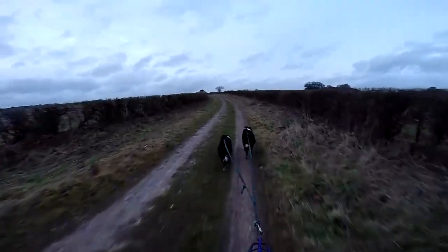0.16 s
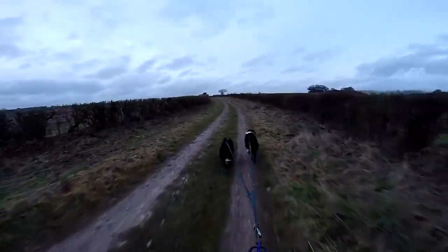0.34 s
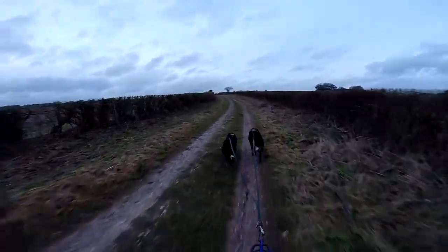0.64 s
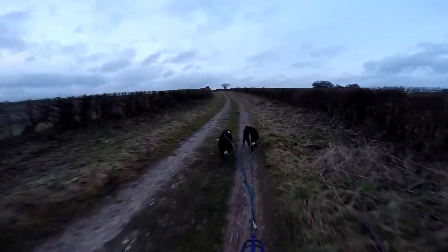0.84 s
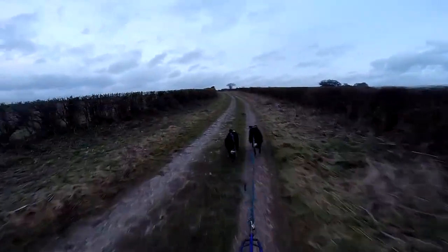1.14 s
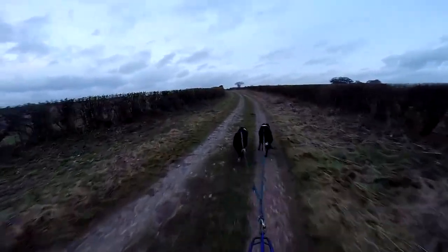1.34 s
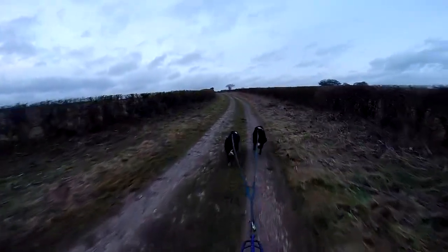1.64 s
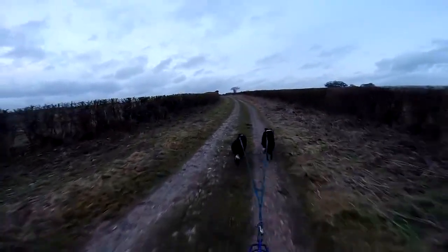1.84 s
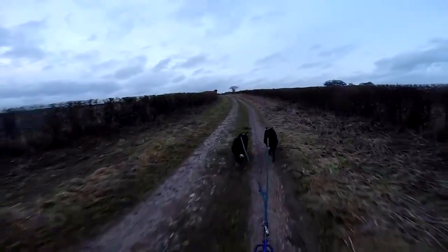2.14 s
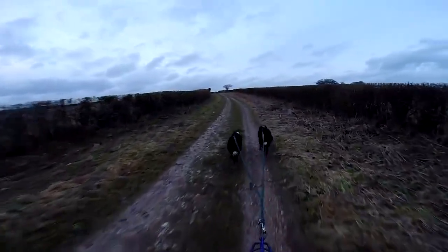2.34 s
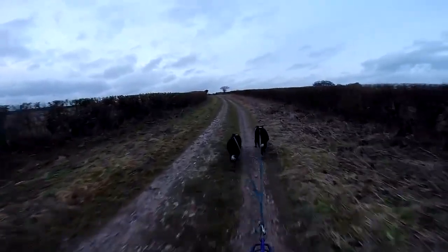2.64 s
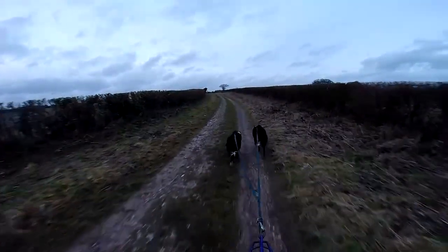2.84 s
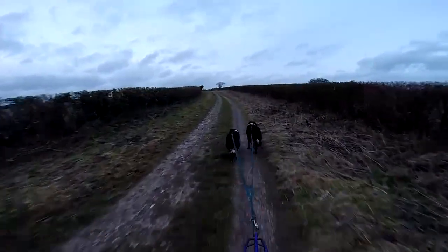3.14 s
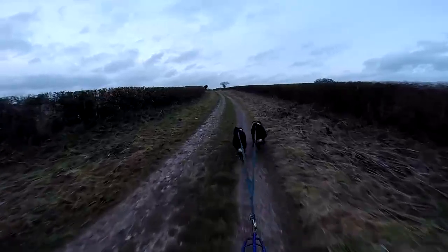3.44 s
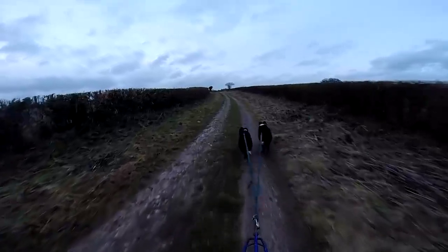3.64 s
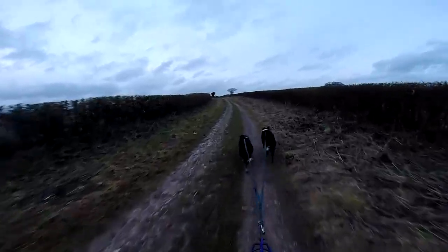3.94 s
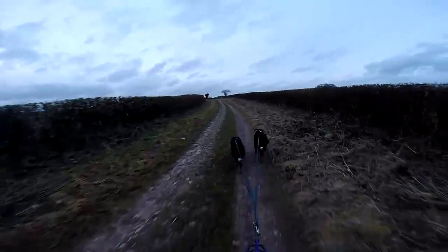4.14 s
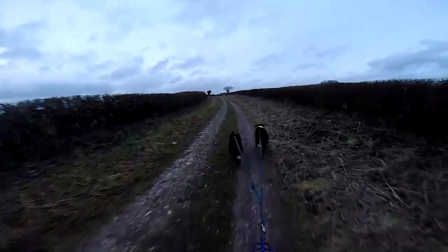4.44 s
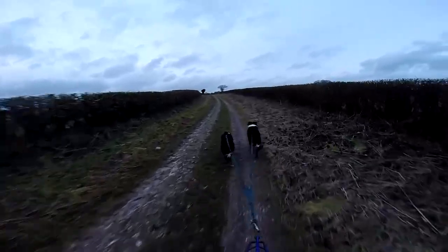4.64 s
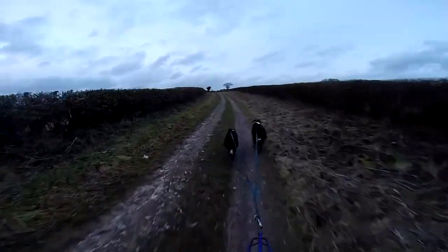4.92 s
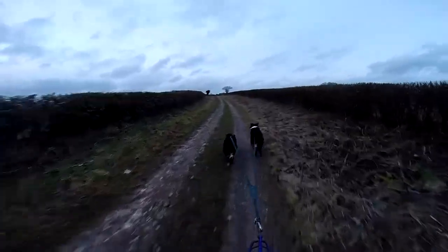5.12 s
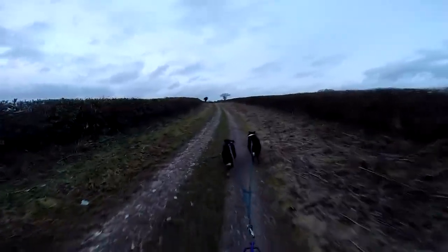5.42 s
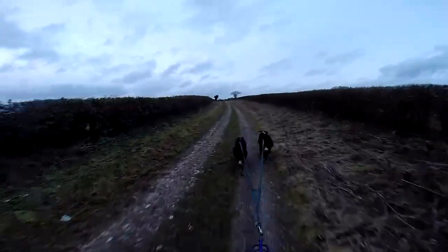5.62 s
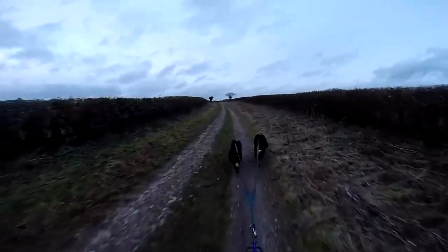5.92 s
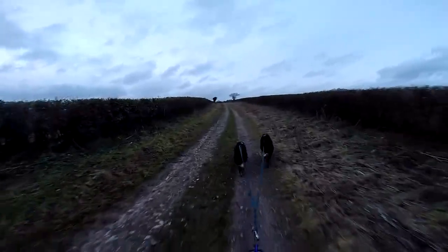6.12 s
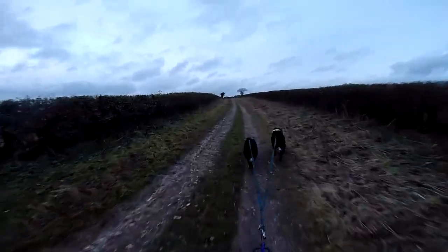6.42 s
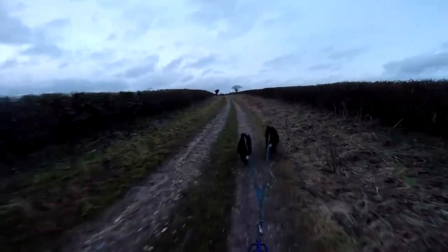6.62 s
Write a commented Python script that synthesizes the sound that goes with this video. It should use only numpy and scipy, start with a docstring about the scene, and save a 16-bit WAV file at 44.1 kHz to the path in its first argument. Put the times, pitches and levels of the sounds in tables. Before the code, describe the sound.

Outdoors on a rough track, scooter tyres scuff briefly through loose dirt and a puff of wind bumps the enclosed microphone. Patches of crackling gravel and irregular pebble pops follow, with a boxy ring, over a low, uneven rumble. A metal hook clinks faintly now and then. Toward the end two stones hit the scooter with dry cracks, the second loudest, followed by more short skids, ticks and knocks.

```python
"""A scooter pulled by two dogs rolls along a gravelly dirt track, heard from inside a closed camera case
that rings boxily at 1.5-3.5 kHz. Wind and the shaking mount rumble underneath from the start.
In the first second the tyres skid, drag through dirt and flick pebbles; then they crunch over patches
of gravel while the tow-line's hook clinks and the frame ticks and thuds now and then. Near 5.4 s two
stones crack against the frame, and the ride goes on through more scuffs, pebbles and gravel."""
import sys
import numpy as np
from scipy import signal
from scipy.fft import rfft, irfft, next_fast_len
from scipy.io import wavfile
from scipy.ndimage import uniform_filter1d

SR = 44100
rng = np.random.default_rng(int(sys.argv[2]) if len(sys.argv) > 2 else 0)


def persist_wave(psi):
    """Save psi, clipped to +-1, as 16-bit WAV."""
    counts = np.round(np.clip(psi, -1, 1) * 32767).astype(np.int16)
    wavfile.write(sys.argv[1], SR, np.atleast_2d(counts).T)


N = 298557


def from_db(db):
    return 10 ** (np.asarray(db) / 20)


def unit_rms(x):
    return x / np.sqrt(np.mean(x ** 2) + 1e-20)


def unit_peak(x):
    return x / np.max(np.abs(x))


def fader(rows):
    """A level in dB at every sample, gliding from point to point."""
    times, levels_db = np.transpose(rows)
    return np.interp(np.arange(N) / SR, times, levels_db)


def add(track, start_s, sound):
    """Mix a sound into the track at its start time."""
    at = max(0, round(start_s * SR))
    track[at:at + len(sound)] += sound[:max(0, N - at)]


def drift(rate_hz):
    """A smooth random wobble with a spread of about 1, mostly slower than rate_hz."""
    step, run_in = 20, 2000
    pole = np.exp(-2 * np.pi * rate_hz * step / SR)
    white = rng.standard_normal(N // step + run_in + 2)
    slow = signal.lfilter([1], [1, -2 * pole, pole * pole], white)[run_in:]
    return np.interp(np.arange(N) / step, np.arange(len(slow)), unit_rms(slow))


def swells(rows, rise_s, decay_s):
    """Envelope of overlapping swells: each rises smoothly to its peak, then dies away."""
    t, power = np.arange(N) / SR, 0
    for peak_s, db in rows:
        shape = np.exp(-(np.minimum(t - peak_s, 0) / rise_s) ** 2 - np.maximum(t - peak_s, 0) / decay_s)
        power = power + (from_db(db) * shape) ** 2
    return np.sqrt(power)


def patches(rows, edge_s):
    """Envelope of stretches of ground that the tyres take edge_s to roll onto, and off."""
    t, power = np.arange(N) / SR, 0
    for start_s, length_s, db in rows:
        on_patch = np.clip(np.minimum(t - start_s, start_s + length_s - t) / edge_s + .5, 0, 1)
        power = power + (from_db(db) * on_patch) ** 2
    return np.sqrt(power)


def equalise(x, curve):
    """Shape the tone with a minimum-phase EQ, so nothing rings ahead of an attack."""
    size = 2 * next_fast_len(len(x) // 2 + 2048)
    hz, db = np.transpose(curve)
    bins_hz = np.maximum(np.arange(size // 2 + 1) * SR / size, 1)
    gain = from_db(np.interp(np.log(bins_hz), np.log(hz), db))
    cepstrum = irfft(np.log(gain))
    cepstrum[1:size // 2] *= 2
    cepstrum[size // 2 + 1:] = 0
    return irfft(rfft(x, size) * np.exp(rfft(cepstrum)))[:len(x)]


def resonance(x, hz, width_hz):
    """A two-pole resonance with gain 1 at its peak."""
    radius = np.exp(-np.pi * width_hz / SR)
    feedforward = np.array([1, 0, -1]) * (1 - radius ** 2) / 2
    feedback = [1, -2 * radius * np.cos(2 * np.pi * hz / SR), radius ** 2]
    return signal.lfilter(feedforward, feedback, x + 1e-18)


def ring(x, modes):
    """A body's resonances, sounding in parallel."""
    return sum(from_db(db) * resonance(x, hz, width_hz) for hz, width_hz, db in modes)


def noise(curve, flutter_db, flutter_hz):
    """Equalised noise whose level flutters; rms 1."""
    return unit_rms(equalise(rng.standard_normal(N) * from_db(flutter_db * drift(flutter_hz)), curve))


def grains(per_s, spread_db):
    """Random clicks, many small and a few larger."""
    sizes = from_db(spread_db * np.minimum(rng.exponential(1, N), 3))
    signs = rng.choice([-1, 1], N)
    return sizes * signs * (rng.random(N) < per_s / SR)


def contact(scatter, decay_s):
    """One sharp blow followed by a dying spray of tiny contacts."""
    t = np.arange(2600) / SR
    blow = scatter * rng.standard_normal(len(t)) * np.exp(-t / decay_s)
    blow[0] = 1
    return blow


# The boxy ring of the case. Each row: pitch in Hz, width in Hz, level in dB over the direct sound.
CASE_RESONANCES = [(1100, 130, -10.5), (1625, 110, -4.5), (1860, 43, -0.5), (2070, 14, 2), (2455, 225, -4),
                   (3253, 160, 3), (4400, 130, -4.5), (5460, 106, -1.5), (8380, 93, -2.5)]
def case(x):
    """Sound passes through the camera case and sets it ringing."""
    return x + ring(x, CASE_RESONANCES)


# The tone of the hiss. Each row: frequency in Hz, gain in dB.
HISS_EQ = [(200, -1), (600, 10), (1000, 8), (4000, 3), (7000, -2), (10000, -6), (13000, -11),
           (15000, -18.5)]
def hiss():
    """A faint, nearly steady bed of hiss, coloured by the case."""
    return from_db(-64) * unit_rms(case(noise(HISS_EQ, flutter_db=0.63, flutter_hz=3.4)))


# The sub-bass of the shaking mount. Each row: frequency in Hz, gain in dB.
MOUNT_EQ = [(10, -20), (20, -10.5), (26, -1), (33, -16.5), (55, -23.5), (100, -48.5), (1000, -140)]
# Bumps in the track. Each row: time of the peak in seconds, level in dB.
TRACK_BUMPS = [(.49, -42), (.9, -39.5), (1.14, -32.5), (1.38, -39), (1.61, -39.5), (2.21, -39), (2.64, -35),
               (2.97, -50), (3.11, -46), (3.31, -45), (3.58, -40), (4.05, -43.5), (4.25, -39.5),
               (4.58, -44), (4.98, -39.5), (5.21, -46), (5.43, -35.5), (5.7, -40.5), (5.93, -36),
               (6.15, -43.5), (6.36, -35.5)]
def mount_rumble():
    """The camera mount shakes near its own slow resonance, and harder at every bump."""
    steady = from_db(-50 + 2 * drift(0.69))
    shake = np.hypot(steady, swells(TRACK_BUMPS, rise_s=0.063, decay_s=0.13))
    rumble = noise(MOUNT_EQ, flutter_db=0, flutter_hz=15)
    rumble /= np.sqrt(uniform_filter1d(rumble ** 2, size=3000))   # evened out: the shake sets the level
    return shake * rumble


# The low tone of wind on the case. Each row: frequency in Hz, gain in dB.
WIND_EQ = [(25, -5.5), (50, 4.5), (90, 0), (130, -3.5), (190, -10.5), (300, -26), (600, -33), (4000, -110)]
# The rise and fall of the breeze. Each row: time in seconds, level in dB.
BREEZE_FADER = [(0, -47.5), (.25, -46.5), (.36, -43.5), (.7, -47.5), (1.4, -52.5), (2.45, -55.5),
                (3.3, -56), (4.1, -51.5), (4.8, -53.5), (6.1, -48.5), (6.45, -53.5), (6.77, -51)]
# Quick gusts. Each row: time of the peak in seconds, level in dB.
WIND_GUSTS = [(1.12, -41.5), (1.74, -46.5), (2.67, -51), (3.57, -43.5), (4.19, -47), (4.63, -43.5),
              (5.28, -50), (6.7, -51)]
# Puffs of air. Each row: start in seconds, level in dB, pitch in Hz.
AIR_PUFFS = [(0.784, -23.5, 95), (5.968, -35, 69.6)]
def wind():
    """Eddies buffet the case, and two puffs hit it squarely."""
    strength = np.hypot(from_db(fader(BREEZE_FADER)), swells(WIND_GUSTS, rise_s=0.028, decay_s=0.026))
    air = strength * noise(WIND_EQ, flutter_db=3, flutter_hz=13.7)
    t = np.arange(3000) / SR
    for start_s, db, hz in AIR_PUFFS:
        # a push and a smaller pull, gone after about one cycle
        add(air, start_s, from_db(db) * np.sin(2 * np.pi * hz * t) * np.exp(-1.6 * hz * t))
    return air


# The dull tone of the juddering frame. Each row: frequency in Hz, gain in dB.
JUDDER_EQ = [(70, -14), (160, -5), (330, 3.5), (420, -6.5), (550, -16), (1000, -20), (4000, -67)]
# Thuds over ruts. Each row: start in seconds, peak level in dB.
RUT_THUDS = [(2.203, -55), (3.824, -50), (4.33, -51.5), (4.886, -45), (5.395, -43.5), (5.529, -48),
             (5.968, -43.5), (6.288, -47)]
def frame_thuds():
    """The frame judders briefly and dully over a rut."""
    out = np.zeros(N)
    for start_s, db in RUT_THUDS:
        thud = equalise(contact(scatter=1, decay_s=0.0081), JUDDER_EQ)
        add(out, start_s, from_db(db) * unit_peak(thud))
    return out


# The bright tone of a tick on the frame. Each row: frequency in Hz, gain in dB.
TICK_EQ = [(200, -12), (800, 3), (3500, 11), (4800, 0.5), (5800, 7.5), (6600, -6), (7700, 4.5), (9000, -25),
           (15000, -45)]
# The midrange tone of a knock or a pebble's pop. Each row: frequency in Hz, gain in dB.
KNOCK_EQ = [(300, -17), (900, 1.5), (1500, 2.5), (2500, 1.5), (3400, -3), (3800, -2), (5800, -12.5),
            (7000, -15.5), (15000, -41)]
# The body of the frame. Each row: pitch in Hz, width in Hz, level in dB.
FRAME_RESONANCES = [(358, 64, 1), (740, 220, -7), (1080, 450, -1)]
# Hard ticks. Each row: start in seconds, peak level in dB, knock level in dB over the tick.
FRAME_TICKS = [(1.188, -43, -22), (3.832, -54, 15.5), (5.533, -57.5, 17), (5.9648, -39.5, -24),
               (6.036, -36, -6), (6.1997, -29.5, -28), (6.3665, -46.5, 5), (6.642, -47, 8.5)]
def frame_ticks():
    """Each hard blow gives a bright tick and makes the frame knock dully."""
    out = np.zeros(N)
    for start_s, db, knock_db in FRAME_TICKS:
        blow = contact(scatter=1, decay_s=0.001)
        tick = unit_peak(case(equalise(blow, TICK_EQ)))
        knock = unit_peak(ring(equalise(blow, KNOCK_EQ), FRAME_RESONANCES))
        add(out, start_s, from_db(db) * (tick + from_db(knock_db) * knock))
    return out


# The ring of the metal hook. Each row: pitch in Hz, width in Hz, level in dB.
HOOK_RESONANCES = [(9300, 160, -1), (9860, 240, -2), (11000, 1100, -9)]
# Clinks of the hook. Each row: start in seconds, peak level in dB.
HOOK_CLINKS = [(1.188, -58), (2.661, -56), (2.740, -58), (5.026, -59), (6.3645, -55), (6.4434, -56)]
def hook_clinks():
    """The tow-line's snap hook is jolted and rings, thin and high."""
    out = np.zeros(N)
    for start_s, db in HOOK_CLINKS:
        clink = ring(contact(scatter=0.5, decay_s=0.0027), HOOK_RESONANCES)
        add(out, start_s, from_db(db) * unit_peak(clink))
    return out


# The low-mid tone of rolling tyres. Each row: frequency in Hz, gain in dB.
ROAR_EQ = [(100, -8), (200, -1.5), (320, -2.5), (430, -6.5), (900, -13), (1500, -23.5), (8000, -69)]
# The rise and fall of the roar. Each row: time in seconds, level in dB.
ROAR_FADER = [(0, -55), (.25, -62), (.58, -58), (.93, -56.5), (1.05, -61.5), (2.2, -60.5), (3.1, -63),
              (4.0, -62), (4.8, -61), (5.9, -61), (6.22, -57), (6.45, -60.5), (6.77, -61)]
def tyre_roar():
    """The tyres roll over the track with a soft, fluttering roar."""
    return from_db(fader(ROAR_FADER)) * noise(ROAR_EQ, flutter_db=1.5, flutter_hz=60)


# The rasp of rubbed dirt. Each row: frequency in Hz, gain in dB.
SCUFF_EQ = [(100, -9), (340, 2.5), (600, -33.5), (900, -13), (1150, -2.5), (1800, -0.5), (2400, -1.5),
            (3200, -8), (4500, -14), (6000, -12.5), (7000, -33), (10000, -34.5), (15000, -51)]
def scuff(per_s):
    """Dirt rubbed sideways: dense fine grains in clumps; rms 1."""
    rub = grains(per_s * from_db(4.6 * drift(50)), spread_db=3)
    return unit_rms(case(equalise(rub, SCUFF_EQ)))


# The rise and fall of the rubbing. Each row: time in seconds, level in dB.
DIRT_FADER = [(0, -55.5), (.36, -58.5), (.55, -50), (.68, -52), (.87, -58), (1.04, -62.5), (1.28, -58),
              (2.45, -63), (2.9, -59), (3.75, -61.5), (4.5, -59.5), (4.94, -63), (5.8, -61), (6.15, -56),
              (6.77, -60)]
def dirt_rub():
    """The tread rubs over fine dirt all along the track."""
    return from_db(fader(DIRT_FADER)) * scuff(per_s=7000)


# Short skids over loose dirt. Each row: start in seconds, length in seconds, level in dB.
TYRE_SKIDS = [(0.325, 0.078, -44.5), (0.558, 0.044, -47.5), (1.277, .16, -62), (5.069, 0.097, -54.5),
              (5.59, 0.048, -50.5), (5.683, 0.076, -54.5)]
def skids():
    """A tyre slides: dirt rattles, sand sprays against the frame, and a hard skid adds a low judder."""
    attack_s, release_s = 0.016, 0.024
    slide = np.zeros(N)
    for start_s, length_s, db in TYRE_SKIDS:
        t = np.arange(round(length_s * SR)) / SR
        envelope = np.clip(np.minimum(t / attack_s, (length_s - t) / release_s), 0, 1)
        add(slide, start_s, from_db(db) * envelope)
    rasp = from_db(2 * drift(160)) * scuff(per_s=1600)
    judder = from_db(-0.5) * np.sqrt(unit_peak(slide)) * noise(JUDDER_EQ, flutter_db=2, flutter_hz=49)
    spray = grains(per_s=2800, spread_db=10.5)
    sand = from_db(-12) * unit_rms(case(equalise(spray, TICK_EQ)))
    return slide * (rasp + judder + sand)


# Drags through soft dirt. Each row: start in seconds, length in seconds, level in dB.
TYRE_DRAGS = [(.34, 0.047, -51.5), (.54, 0.066, -63), (.63, 0.11, -52), (.77, 0.071, -55),
              (.83, 0.057, -51), (5.86, 0.031, -54.5), (5.975, 0.099, -58), (6.25, 0.18, -65)]
def drags():
    """A tyre ploughs through dirt: clumps of grains rasp in one broad resonance as the frame judders."""
    rasp_hz, width_hz = 1800, 840
    rub = grains(per_s=2600 * from_db(5 * drift(90)), spread_db=5.5)
    rasp = resonance(resonance(rub, rasp_hz, width_hz), rasp_hz, width_hz)
    judder = from_db(-5.5) * noise(JUDDER_EQ, flutter_db=1.5, flutter_hz=24)
    return patches(TYRE_DRAGS, edge_s=0.017) * (unit_rms(rasp) + judder)


# The bite of cracking grit. Each row: frequency in Hz, gain in dB.
CRUNCH_EQ = [(500, -5.5), (1200, -7), (1900, -7.5), (2600, 4.5), (3300, 1), (3650, -2), (4400, -6.5),
             (4900, -14.5), (5900, -8.5), (6700, -15), (9000, -15), (15000, -51)]
# Patches of gravel. Each row: start in seconds, length in seconds, level in dB.
GRAVEL_PATCHES = [(1.237, 0.18, -50), (1.516, 0.02, -52), (1.701, .2, -62), (2.11, .2, -61),
                  (2.515, 0.13, -57), (2.697, .62, -59), (3.41, 0.15, -55.5), (3.828, 0.083, -53),
                  (4.045, 0.563, -57), (5.857, .27, -60.5), (6.323, 0.12, -55), (6.489, .35, -58.5)]
def gravel_crunch():
    """Grit cracks under the tread in clumps over fine dust; each grain rings at one of five pitches."""
    thin_cover = from_db(-63.5)
    level = np.hypot(thin_cover, patches(GRAVEL_PATCHES, edge_s=0.047))
    level_db = 20 * np.log10(level)
    thickness_db = level_db - np.mean(level_db)
    # more grains crack in a thicker patch, so it merges into one dense crunch
    per_s = 52 * from_db(1.1 * thickness_db + 5 * drift(45))
    pitches_hz = np.geomspace(2000, 4200, num=5)
    grit = sum(resonance(grains(per_s, spread_db=2.5), hz, width_hz=1080) for hz in pitches_hz)
    grit = unit_rms(grit * from_db(-0.55 * thickness_db))   # offsets the loudness of the extra grains
    dust = from_db(-7) * rng.standard_normal(N)
    return level * unit_rms(case(equalise(grit + dust, CRUNCH_EQ)))


# The dry tone of stone on frame. Each row: frequency in Hz, gain in dB.
CRACK_EQ = [(300, -41), (900, -10.5), (1500, 0), (2400, 4.5), (3300, -5.5), (3750, -25), (5500, -31),
            (7000, -34), (15000, -55)]
# A stone's chatter as it leaves the frame. Each row: delay in seconds, level in dB against the blow.
STONE_REBOUNDS = [(.0013, -26), (.0037, -10), (.0076, -24)]
# Stone hits. Each row: start in seconds, peak level in dB.
STONE_HITS = [(5.3826, -28), (5.4299, -17)]
def stone_cracks():
    """A stone hits the frame: one broad, dry crack and a few softer, duller rebounds."""
    rebound_cutoff_hz, ring_db = 1710, -1.5
    out, blow, chatter = np.zeros(N), np.zeros(SR // 20), np.zeros(SR // 20)
    blow[0] = 1
    for delay_s, db in STONE_REBOUNDS:
        chatter[round(delay_s * SR)] = from_db(db)
    chatter = signal.lfilter(*signal.butter(2, rebound_cutoff_hz, fs=SR), chatter)
    crack = equalise(blow + chatter, CRACK_EQ)
    crack = unit_peak(crack + from_db(ring_db) * ring(crack, CASE_RESONANCES))
    for start_s, db in STONE_HITS:
        add(out, start_s, from_db(db) * crack)
    return out


# Pebbles flicked by the tyres. Each row: start in seconds, peak level in dB, pitch in Hz.
PEBBLE_POPS = [(0.2893, -40, 1550), (0.3201, -29, 2500), (0.3223, -30, 2730), (0.3428, -31, 1500),
               (0.366, -33, 2000), (0.4915, -38, 2600), (0.58, -40, 2190), (0.623, -35, 1920),
               (0.8427, -26.5, 2700), (0.8446, -31.5, 3160), (0.893, -38, 2300), (0.9062, -39.5, 3240),
               (1.026, -31.5, 2800), (1.1877, -35, 2420), (1.21, -36.5, 3170), (1.2567, -40, 2400),
               (1.28, -40, 2330), (1.4401, -27.5, 2630), (1.538, -37.5, 2980), (1.6023, -36, 3170),
               (1.7438, -37, 3240), (2.146, -37, 3400), (2.2458, -36, 2950), (2.456, -41, 3200),
               (2.5988, -37.5, 2940), (2.734, -35.5, 3270), (2.829, -40.5, 1800), (2.898, -40, 2540),
               (2.96, -39.5, 2340), (3.152, -34.5, 2910), (3.1981, -36, 2970), (3.243, -37.5, 2490),
               (3.2726, -24, 2600), (3.3022, -42, 3150), (3.3166, -41, 2400), (3.5156, -39.5, 2430),
               (3.65, -35.5, 3210), (3.7439, -37, 2730), (3.8183, -33.5, 3420), (3.83, -32, 2040),
               (3.9332, -38, 3180), (3.985, -40.5, 2460), (4.091, -36, 3120), (4.151, -35, 2840),
               (4.17, -32.5, 1970), (4.2014, -35.5, 2620), (4.4242, -39, 2860), (4.492, -39, 2270),
               (4.5812, -37, 2630), (4.586, -36, 2740), (4.687, -38, 1960), (5.287, -38, 2600),
               (5.31, -38.5, 2790), (5.3467, -42, 3240), (5.5207, -40, 3160), (5.5455, -38, 2560),
               (5.7516, -35.5, 2600), (5.888, -38.5, 1860), (5.9293, -39, 3200), (5.963, -39, 1840),
               (6.059, -38, 2170), (6.179, -40, 2580), (6.2017, -33, 1860), (6.251, -34, 2680),
               (6.324, -40, 2350), (6.642, -33, 2920), (6.6466, -39, 2780)]
def pebble_pops():
    """A pebble squeezed out from under the tyre slips, pops and stirs its neighbours."""
    width_hz = 830   # a wide resonance: each pop is over in two or three cycles
    slip_lead_s, slip_db = 0.0035, -14
    out = np.zeros(N)
    for start_s, db, hz in PEBBLE_POPS:
        pop = resonance(contact(scatter=0.099, decay_s=0.0035), hz, width_hz)
        slip = resonance(contact(scatter=0.79, decay_s=0.0016), hz, width_hz)
        add(out, start_s + 0.0006, from_db(db) * unit_peak(case(equalise(pop, KNOCK_EQ))))
        add(out, start_s - slip_lead_s, from_db(db + slip_db) * unit_peak(case(equalise(slip, KNOCK_EQ))))
    return out


def scene():
    """The mono mix: a bed of hiss and rumble, the tyres on the dirt, and the sharp hits on top."""
    bed = hiss() + mount_rumble() + wind()
    tyres = tyre_roar() + dirt_rub() + gravel_crunch() + skids() + drags()
    hits = pebble_pops() + stone_cracks() + frame_ticks() + hook_clinks() + frame_thuds()
    return (bed + tyres + hits)[None]


def record(dry):
    """A steep low-pass takes off the very top."""
    cutoff_hz = 15100
    return signal.sosfilt(signal.ellip(12, .1, 80, cutoff_hz, fs=SR, output="sos"), dry)


dry = scene()
out = record(dry)
persist_wave(out)
```